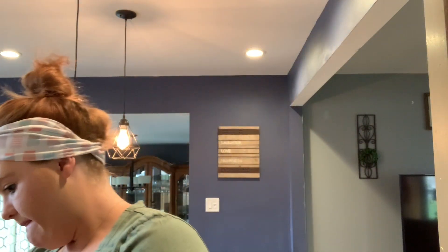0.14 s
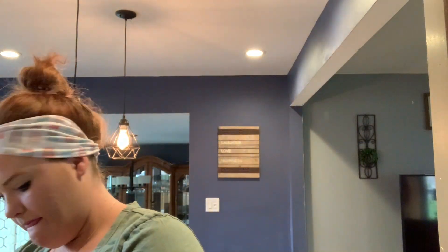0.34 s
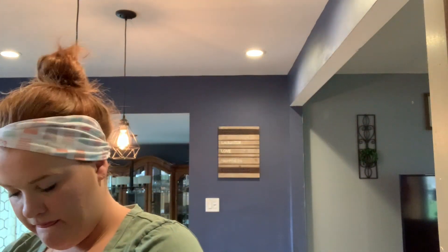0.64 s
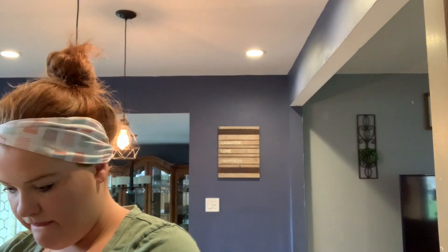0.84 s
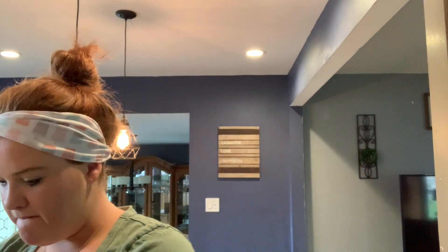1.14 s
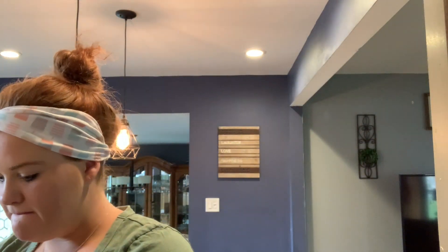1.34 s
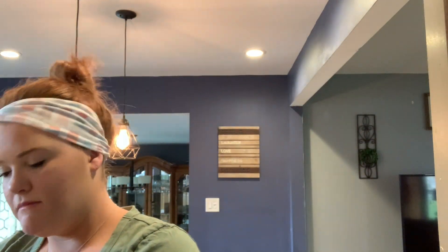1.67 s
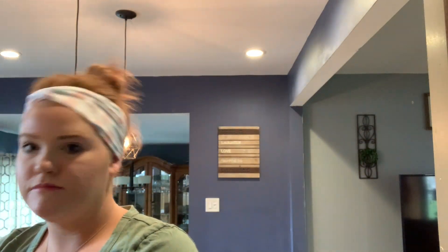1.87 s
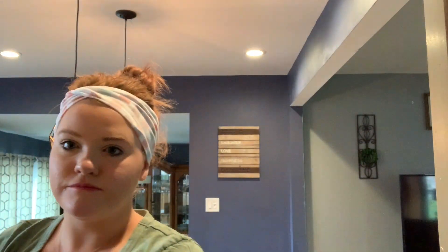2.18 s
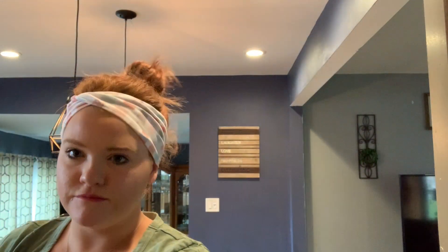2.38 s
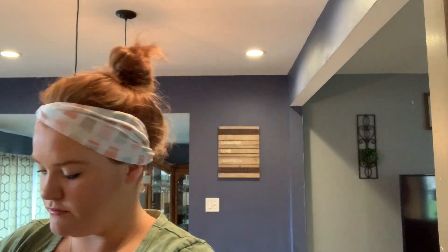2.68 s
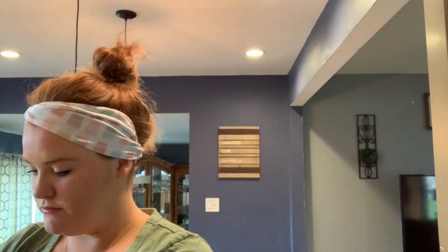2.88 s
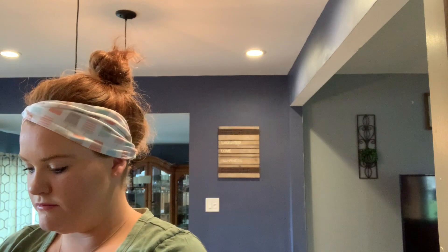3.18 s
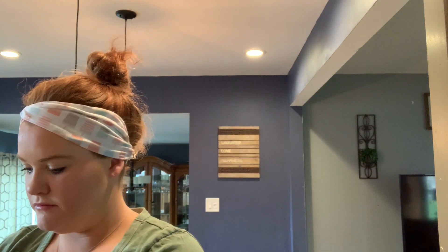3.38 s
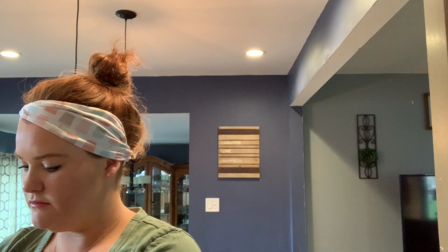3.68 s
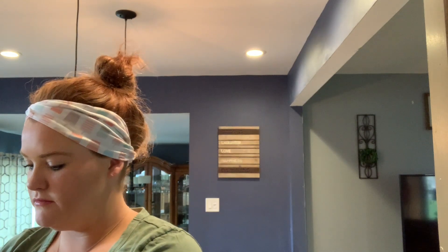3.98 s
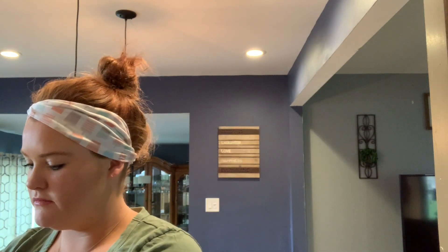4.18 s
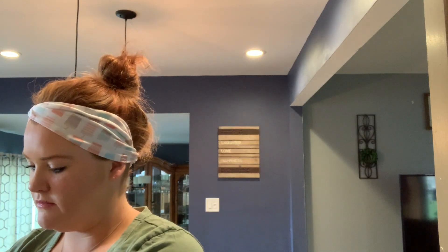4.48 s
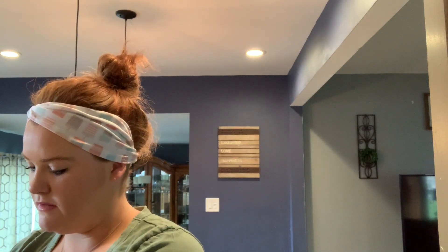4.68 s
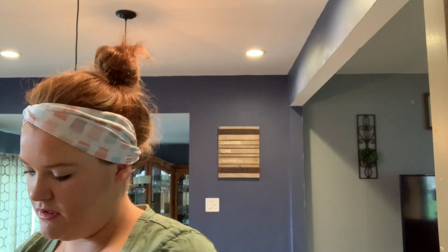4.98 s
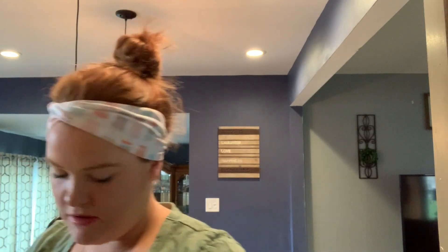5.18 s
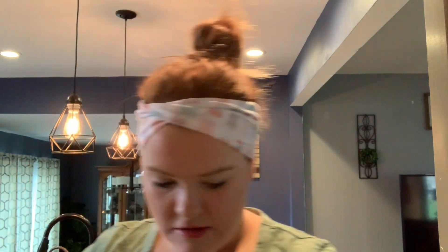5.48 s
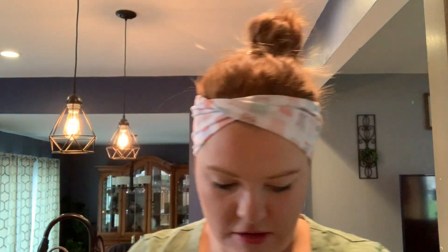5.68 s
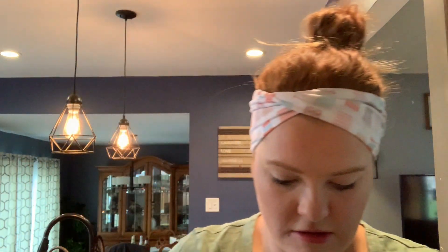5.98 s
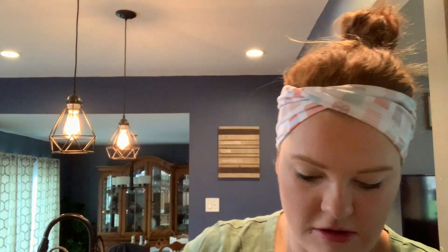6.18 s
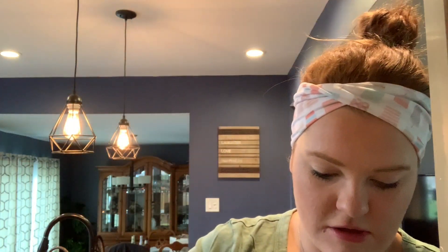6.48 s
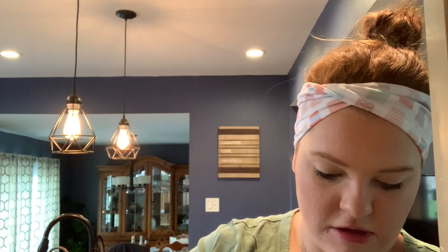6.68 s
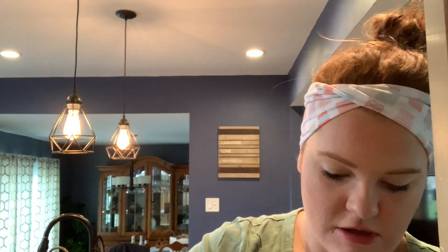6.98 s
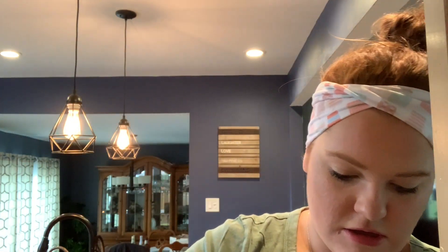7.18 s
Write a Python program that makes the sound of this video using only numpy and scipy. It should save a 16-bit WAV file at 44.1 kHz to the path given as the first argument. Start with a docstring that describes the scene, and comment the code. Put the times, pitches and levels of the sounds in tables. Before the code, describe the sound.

In a quiet home kitchen, a cup lightly knocks and scuffs the dispenser paddle. A flap thumps open and a low motor hums while ice clatters loudly through a plastic bin and drops into the cup. The motor stops, last cubes settle, and after soft handling rustle the carried cup rattles with bright ice on the other side of a close stereo microphone.

```python
"""Light knocks, then the chute flap of a refrigerator ice dispenser thumps open. Its auger motor hums
for two seconds while ice cubes tumble through the bin and drop into a cup. The cup is then carried
to the other side of the microphone, where its ice rattles. Blows are shaped noise, struck objects are
dying sines, the motor is mains harmonics; diffuse tails add the room, over faint steady noise."""
import sys
import numpy as np
from scipy import signal
from scipy.fft import rfft, irfft, next_fast_len
from scipy.io import wavfile
from scipy.ndimage import uniform_filter1d

SR = 44100
rng = np.random.default_rng(int(sys.argv[2]) if len(sys.argv) > 2 else 0)


def inscribe(sig):
    """Save sig as 16-bit PCM at rate SR to the path in sys.argv[1].

    A 1-D sig is mono; a 2-D sig holds one channel per row.
    Samples are clipped to [-1, 1] before scaling.
    """
    pcm = np.round(np.clip(np.atleast_2d(sig).T, -1, 1) * 32767)
    wavfile.write(sys.argv[1], SR, pcm.astype(np.int16))


N = 323694

# Event and mode levels are relative to the offsets in the functions; t60 is the time to fall 60 dB.
# hardest blows in bin and chute, from the first jolts of flap and solenoid to the last cube:
# start_s, clack_db, click_db
BIN_BLOWS = [(1.793, -23.5, -42), (1.808, -7, -31), (1.822, -23.5, -23), (1.942, -13, -42.5),
             (1.979, -14.5, -34), (2.019, -8, -35), (2.069, -12, -26), (2.101, -14, -25.5),
             (2.122, -17, -26.5), (2.174, -10, -32), (2.219, -4.5, -28.5), (2.29, -16, -28.5),
             (2.327, -20, -27), (2.418, -17, -28.5), (2.432, -9, -35.5), (2.465, -16.5, -29),
             (2.548, -13, -28), (2.673, -12, -32), (2.7, -17, -38), (2.729, -14.5, -38),
             (2.778, -23.5, -35.5), (2.835, -39, -31.5), (2.882, -32, -27), (3.03, -9.5, -37.5),
             (3.235, -19, -36.5), (3.249, -16, -40.5), (3.308, -20.5, -31.5), (3.455, -14, -36),
             (3.494, -9, -32), (3.565, -15, -23), (3.593, -17, -38.5), (3.654, -10.5, -26.5),
             (3.707, -23, -38), (3.755, -22, -29.5), (3.802, -32.5, -30.5), (3.893, -42, -29.5),
             (4.075, -13.5, -31), (4.09, -16.5, -45), (4.205, -11.5, -42), (4.245, -27, -32.5),
             (4.411, -54, -32)]
# cubes falling from the chute onto ice in the cup: start_s, clack_db, click_db
CUBE_DROPS = [(2.492, -10.5, -43), (3.02, -10.5, -34), (3.063, -12.5, -39.5), (3.083, -13.5, -43),
              (4.122, -13, -37.5), (4.223, -26, -22), (4.518, -31.5, -49), (4.564, -32, -46.5),
              (4.608, -38, -54), (4.66, -42, -53.5), (4.748, -43.5, -57)]
# hardest knocks of ice in the carried cup: start_s, clack_db, click_db
CUP_RATTLES = [(6.192, -47, -49), (6.274, -39, -63), (6.342, -24, -36), (6.355, -22.5, -19.5),
               (6.364, -11.5, -30), (6.379, -21, -22.5), (6.393, -16.5, -28), (6.414, -32, -33),
               (6.44, -22, -27.5), (6.448, -13.5, -20.5), (6.463, -19, -38), (6.531, -11, -23.5),
               (6.596, -20.5, -28.5), (6.645, -18.5, -18), (6.679, -24, -35), (6.706, -40, -31.5),
               (6.778, -16, -20), (6.809, -19, -22), (6.848, -14.5, -36), (6.857, -23, -22),
               (6.867, -17, -23), (6.876, -24, -23.5), (6.89, -23, -28.5), (6.918, -25, -46),
               (7.022, -23, -25.5), (7.161, -30.5, -52)]
# light knocks of cup and paddle: start_s, clack_db, click_db, thud_db
LIGHT_KNOCKS = [(0.364, -42.5, -39.5, -43), (0.657, -44, -38.5, -35.5), (1.463, -45, -50, -24.5),
                (1.543, -42.5, -54, -24), (1.585, -42, -63.5, -37)]
# dull bumps of cup, door and person: start_s, level_db
DULL_BUMPS = [(0.66, -35), (4.04, -36.5), (4.08, -35.5), (5.954, -35.5), (5.988, -33), (6.158, -43),
              (6.24, -44.5), (6.691, -35.5), (7.039, -37)]
# flap swings open and hits its stop: start_s, level_db
FLAP_THUMPS = [(1.802, -16.5), (1.82, -12)]
# ice load hits the side of the cup: start_s, level_db
ICE_SLAPS = [(6.341, -19.5), (6.531, -22), (6.638, -25), (7.017, -33)]
# cube meets the cup wall squarely: start_s, level_db, tilt_db_per_octave, ring_length_factor
CUP_CLINKS = [(3.428, -25, 2, 0.75), (4.375, -25, -17, 1.1), (4.384, -25, -1.5, 0.62),
              (6.598, -28, 12, 0.34), (6.676, -30, 11.5, 0.76), (6.772, -24, 6, 0.83),
              (7.035, -34, 4.5, 1.14)]

# surges of tumbling ice, two under the auger, one as it stops: start_s, length_s, level_db
ICE_SURGES = [(2.02, 0.36, -27), (3.52, 0.2, -33), (4.02, .11, -23)]
# carried cup tilts, its ice slides: start_s, length_s, level_db
CUP_TILTS = [(5.49, .13, -46), (6.09, 0.22, -43), (6.345, .13, -31), (6.52, .38, -37)]
# hand and sleeve rub on cup and door: start_s, length_s, level_db
HAND_RUBS = [(1.17, 0.38, -56.5), (4.7, 2.51, -61.5), (5.83, 0.053, -44.5), (5.98, 0.086, -48.5)]
# cup scuffs the paddle, going in and coming out: start_s, length_s, level_db
PADDLE_SCUFFS = [(1.355, .09, -47), (5.83, .05, -48)]

# flap and door modes: pitch_hz, level_db, t60_s
DOOR_MODES = [(145.2, -4, 0.27), (161.5, 5.5, 0.035), (273.6, 4.5, 0.046), (359.4, 4.5, 0.094)]
# snapping flap stop: pitch_hz, level_db, t60_s
STOP_MODES = [(1223, 0, 0.1), (2090, 5, 0.13)]
# plastic bin and chute: pitch_hz, level_db, t60_s
PLASTIC_MODES = [(1066.5, 7, 0.072), (1568, -1, 0.05), (3600, -6, 0.12)]
# thin chute walls, singing on after the blows: pitch_hz, level_db, t60_s
CHUTE_WALL_MODES = [(675, 0, .5), (777, -1, .6), (1312, -1, .35)]
# one hard cube pinging: pitch_hz, level_db, t60_s
CUBE_PING_MODES = [(14649, 0, .1), (14848, 0, .09), (15265, 0, .11)]
# cup jostled by loose ice: pitch_hz, level_db, t60_s
JOSTLED_CUP_MODES = [(927, 21, 0.049), (1433, 29, 0.11), (2630, 2, 0.12)]
# cube on cup wall, before the shifts of each clink: pitch_hz, level_db, t60_s
CUP_WALL_MODES = [(1890, 0, 0.055), (3690, -17, 0.04), (4395, -5, 0.08), (4490, -9, 0.035),
                  (5500, -14, 0.04)]
# hollow of the cup: pitch_hz, level_db, t60_s
CUP_HOLLOW_MODES = [(904, 0, .12), (975, -5, .07), (1254, -8, .07)]
# hollow clunk of the cup set in place: pitch_hz, level_db, t60_s
CUP_SET_MODES = [(541, 5, 0.13), (660, 1.5, 0.17)]
# rim scraping as the cup is picked up: pitch_hz, level_db, t60_s
CUP_RIM_MODES = [(3760, 6, 0.01), (4040, 1, 0.011)]
# groaning paddle: pitch_hz, level_db, t60_s
PADDLE_MODES = [(334, 0, 0.032), (433, -1, 0.044)]
# auger motor: mains_multiple, relative_level_db
MOTOR_HARMONICS = [(1, -9), (2, 10), (4, -9), (6, -8)]

# blows in the bin: frequency_hz, relative_density_db
BIN_SPECTRUM = [(60, -7.5), (150, 0), (800, 2), (1400, 3.5), (2200, -4), (3000, -13.5), (4000, -20),
                (6500, -15), (8800, -21.5), (12000, -20.5), (15500, -43)]
# drops onto ice: frequency_hz, relative_density_db
DROP_SPECTRUM = [(100, -11.5), (400, 3.5), (1300, 6), (2300, 3.5), (3300, -12), (4200, -23), (6500, -19),
                 (9000, -24), (15500, -37.5)]
# ice in the carried cup: frequency_hz, relative_density_db
CUP_SPECTRUM = [(60, -7.5), (150, 1), (240, -23), (400, -8.5), (570, -26.5), (880, 2.5), (1150, 0.5),
                (1600, -7.5), (2400, -6), (3200, -12.5), (5500, 1), (7200, 4.5), (9000, 0.5), (13000, -8.5)]
# knocks of cup and paddle: frequency_hz, relative_density_db
KNOCK_SPECTRUM = [(60, -7), (200, 1), (400, 5), (580, 4.5), (1500, 1.5), (2500, -9), (3100, -17),
                  (4000, -30), (5600, -26), (15000, -44.5)]
# brittle crack of first contact: frequency_hz, relative_density_db
CRACK_SPECTRUM = [(400, -31.5), (1800, -2.5), (6000, -4.5), (14000, -2.5)]
# rubbing: frequency_hz, relative_density_db
RUB_SPECTRUM = [(80, -18), (390, 3), (600, -5), (1400, -5.5), (2200, -9), (4300, -18.5), (7000, -27.5),
                (15000, -50)]
# steady background noise: frequency_hz, relative_density_db
AIR_SPECTRUM = [(25, -40), (42, -16.5), (60, 3), (85, -14.5), (150, -4), (230, -14), (500, -19.5),
                (1100, -36), (1700, -43), (2500, -35), (3200, -50.5), (4500, -53), (9000, -52.5),
                (13000, -55)]

# microphone pair, from the refrigerator: frequency_hz, likeness_0_to_1, left_lead_rad, left_minus_right_db
FROM_FRIDGE_PORTS = [(120, .99, 0, 7), (340, .85, 0, 2), (600, .35, 1.7, 3), (1030, .5, .6, 1),
                     (2150, .6, .4, 0), (2930, .3, 2.4, -1), (4000, .35, .7, -1), (6000, .4, 1.7, 0),
                     (8600, .98, 3.1, 0), (10200, .88, 3.5, 0), (13000, .96, 6.2, 0)]
# microphone pair, from the other side: frequency_hz, likeness_0_to_1, left_lead_rad, left_minus_right_db
FROM_SIDE_PORTS = [(100, .95, 0, 3), (800, .92, -2.2, -1), (1550, .7, -3.8, -3), (2500, .85, -7.9, -1),
                   (3200, .85, -9.2, 0), (3800, .8, -11.9, -3), (5500, .7, -17.3, -2),
                   (8800, .95, -15.7, 0), (13000, .92, -12.6, 0)]
# kitchen tails: frequency_hz, t60_s
KITCHEN_DECAY = [(150, 0.48), (530, 0.4), (3700, 0.4), (9700, 0.17), (15000, 0.21)]

MAINS_HZ, EDGE_HZ, AIR_DB = 60, 16100, -52
PING_S, PING_DB = 2.102, -27.5
SNAP_S, SNAP_DB = 1.814, -26
CLUNK_S, CLUNK_DB = 0.66, -38
RIM_S, RIM_LENGTH_S, RIM_DB, RIM_FALL_DB_PER_S = 0.362, 0.0096, -52.5, 141
CARRIED_S = 5  # clinks after this belong to the carried cup
BOUNCE_S, BOUNCE_CLACK_DB, BOUNCE_CLICK_DB = .028, -17, -16  # one weaker rebound
ROCK_S, ROCK_DB = 0.0085, -20  # each rattle rocks the cup in the hand, a moment later
MOTOR_ON_S, MOTOR_RUN_S, MOTOR_DB = 1.805, 2.212, -37
SPIN_UP_S, COAST_DB_PER_S = 0.0187, 348
STIR_DB, RUN_ON_S, SETTLE_DB_PER_S = -35, 0.33, 56  # ice tumbles on after the motor, then settles
SURGE_RISE_S, SURGE_FALL_DB_PER_S = 0.13, 95
TILT_RISE_S, TILT_FALL_DB_PER_S = 0.0053, 292
RUB_RISE_S, RUB_FALL_DB_PER_S, RUB_PATCHY_DB = 0.01, 173, 3.5
GENTLE_DB, DULLING_DB_PER_DB = -43, 0.068  # below GENTLE_DB the click falls faster than the clack
CRACK_T60_S, GRAIN_T60_S, GRAIN_LUMPS_DB = 0.012, 0.045, 6.5  # grain: small contacts
CHATTER_S, SLAP_SPREAD_S = 0.003, 0.005  # decay times of flurries; slapped cubes land spread out


def dispenser():
    """The flap thumps, ice churns in the bin, and cubes clatter down into the cup."""
    blows = with_thud(bounced(BIN_BLOWS), clack_db=-5.5, click_db=2.5, thud_db=-10.5)
    clatter = strikes(blows, BIN_SPECTRUM, thud_t60_s=0.13, clack_t60_s=0.052, click_t60_s=0.064,
                      lumps_db=5.5, rise_s=0.0028, crack_db=7)
    drops = with_thud(bounced(CUBE_DROPS), clack_db=-2.5, click_db=5.0, thud_db=-11.0)
    clatter += strikes(drops, DROP_SPECTRUM, thud_t60_s=0.15, clack_t60_s=0.035, click_t60_s=0.063,
                       lumps_db=6, rise_s=0.0019, crack_db=-3.5)

    tumbling = swells([(MOTOR_ON_S, MOTOR_RUN_S + RUN_ON_S, STIR_DB)], SPIN_UP_S, SETTLE_DB_PER_S)
    stir = np.hypot(tumbling, swells(ICE_SURGES, SURGE_RISE_S, SURGE_FALL_DB_PER_S))
    contacts = jostle(stir, start_s=MOTOR_ON_S, end_s=4.95, clack_db=-2, click_db=-6.5, thud_db=-9.5,
                      spread_db=2.5, count=115)
    churn = strikes(contacts, BIN_SPECTRUM, thud_t60_s=0.14, clack_t60_s=GRAIN_T60_S,
                    click_t60_s=GRAIN_T60_S, lumps_db=GRAIN_LUMPS_DB, rise_s=0.00096, crack_db=1.0)

    partials = chimes(BIN_BLOWS + CUBE_DROPS, low_hz=550, high_hz=6500, ring_db=-13, t60_s=.08)
    blows_sound = clatter + churn + partials
    out = blows_sound + ringing(blows_sound, PLASTIC_MODES, ring_db=-23.5)
    out += ringing(blows_sound, CHUTE_WALL_MODES, ring_db=-24.5)
    out += clinks([row for row in CUP_CLINKS if row[0] < CARRIED_S])
    add(out, PING_S, amp(PING_DB) * chattered(CUBE_PING_MODES, CHATTER_S))
    add(out, SNAP_S, amp(SNAP_DB) * ring(STOP_MODES))
    return kitchen(out, wet_db=-3.5, treble_db=2.5) + flap() + motor()


def flap():
    """Door modes with a slow attack: the heavy door takes a moment to swing."""
    out = np.zeros((2, N))
    door = ring(DOOR_MODES)
    door *= 1 - np.exp(-np.arange(len(door)) / SR / 0.0058)
    for s, db in FLAP_THUMPS:
        add(out, s, amp(db) * door)
    return out


def motor():
    """Mains harmonics of the auger motor, each wavering at random in level and phase."""
    t = np.arange(N) / SR
    knots_s = np.arange(0, t[-1] + 1, .08)
    hum = np.zeros(N)
    for k, db in MOTOR_HARMONICS:
        waver, slip = (np.interp(t, knots_s, row) for row in rng.standard_normal((2, len(knots_s))))
        phase = 2 * np.pi * (round(k) * MAINS_HZ * t + rng.random()) + 0.047 * k * slip
        hum += amp(db + 0.083 * k * waver) * np.sin(phase)
    return swells([(MOTOR_ON_S, MOTOR_RUN_S, MOTOR_DB)], SPIN_UP_S, COAST_DB_PER_S) * evened(hum)


def carried_cup():
    """Loose cubes knock against each other and the wall of the cup."""
    rattles = with_thud(bounced(CUP_RATTLES), clack_db=-1.5, click_db=0, thud_db=-16.0)
    ice = strikes(rattles, CUP_SPECTRUM, thud_t60_s=0.2, clack_t60_s=0.04, click_t60_s=0.018,
                  lumps_db=4.5, rise_s=0.0015, crack_db=0.0)
    sliding = swells(CUP_TILTS, TILT_RISE_S, TILT_FALL_DB_PER_S)
    contacts = jostle(sliding, start_s=CUP_TILTS[0][0], end_s=6.95, clack_db=2.5, click_db=-10.0,
                      thud_db=-19.0, spread_db=3.5, count=170)
    ice += strikes(contacts, CUP_SPECTRUM, thud_t60_s=0.12, clack_t60_s=GRAIN_T60_S, click_t60_s=0.015,
                   lumps_db=GRAIN_LUMPS_DB, rise_s=0.0024, crack_db=-12.5)
    cup = ringing(ice, JOSTLED_CUP_MODES, ring_db=-20)
    ice += cup + chimes(CUP_RATTLES, low_hz=900, high_hz=6500, ring_db=-11, t60_s=.04)
    ice += clinks([row for row in CUP_CLINKS if row[0] > CARRIED_S])
    for s, db in ICE_SLAPS:
        add(ice, s, amp(db) * chattered(CUP_HOLLOW_MODES, SLAP_SPREAD_S))
    rocking = bumps([(s + ROCK_S, (clack + click) / 2 + ROCK_DB) for s, clack, click in CUP_RATTLES])
    return kitchen(ice, wet_db=-11, treble_db=-2.5) + rocking


def strikes(rows, spectrum, thud_t60_s, clack_t60_s, click_t60_s, lumps_db, rise_s, crack_db,
            low_hz=480, high_hz=3500, size=8192):
    """Each blow is a crack plus dense modes in three decaying ranges, with spectral peaks of its own."""
    t, hz = np.arange(size) / SR, np.fft.rfftfreq(size, 1 / SR)
    below = 1 / (1 + (hz / low_hz) ** 8)
    above = 1 - 1 / (1 + (hz / high_hz) ** 8)
    # rows: clack, click, thud, crack
    ranges = np.sqrt([abs(1 - below - above), above, below]) * amp(read(spectrum, hz))
    ranges = np.vstack([ranges, amp(read(CRACK_SPECTRUM, hz))])
    decay = amp(-60 * t / np.array([[clack_t60_s], [click_t60_s], [thud_t60_s], [CRACK_T60_S]]))
    shape = decay * (1 - np.exp(-t / (rise_s * np.array([[1], [1], [2], [.5]]))))
    peaks_hz = np.linspace(0, np.sqrt(SR / 2), 85) ** 2
    out = np.zeros((2, N))
    for s, clack, click, thud in rows:
        own = ranges * amp(lumps_db * np.interp(hz, peaks_hz, rng.standard_normal(len(peaks_hz))))
        own *= size / np.sqrt(2 * np.sum(own ** 2, 1, keepdims=True))
        phases = np.exp(2j * np.pi * rng.random((2, 1, len(hz))))
        gains = amp([clack, click, thud, click + crack_db])[:, None]
        add(out, s, (irfft(phases * own) * shape * gains).sum(1))
    return out


def with_thud(rows, clack_db, click_db, thud_db):
    """The thud of a blow grows with both its clack and its click."""
    return [(s, clack + clack_db, click + click_db, (clack + click) / 2 + thud_db)
            for s, clack, click in rows]


def bounced(rows):
    """Each blow and its weaker rebound."""
    return rows + [(s + BOUNCE_S * rng.uniform(.85, 1.15), clack + BOUNCE_CLACK_DB, click + BOUNCE_CLICK_DB)
                   for s, clack, click in rows]


def jostle(stir, start_s, end_s, clack_db, click_db, thud_db, spread_db, count):
    """Many small contacts at chance moments, their strength following the stirring of the ice."""
    s = start_s + (end_s - start_s) * (np.arange(count) + 2 * rng.random(count)) / count
    stir_db = 20 * np.log10(np.interp(s, np.arange(N) / SR, stir) + 1e-9)
    chance = rng.standard_normal((count, 3)) + rng.standard_normal((count, 1))
    chance_db = spread_db * chance.clip(-2, 2)
    dull_db = np.outer(DULLING_DB_PER_DB * np.minimum(stir_db - GENTLE_DB, 0), [0, 1, 0])
    levels_db = stir_db[:, None] + [clack_db, click_db, thud_db] + chance_db + dull_db
    return np.column_stack([s, levels_db])


def chimes(rows, low_hz, high_hz, ring_db, t60_s, count=3):
    """Each blow rings with its own partials: low ones follow its clack, high ones its click."""
    out = np.zeros((2, N))
    for s, clack, click in rows:
        height = (np.arange(count) + rng.random(count)) / count
        modes = [(low_hz * (high_hz / low_hz) ** h, clack + (click - clack) * h, t60_s * rng.uniform(0.81, 1.6))
                 for h in height]
        add(out, s, amp(ring_db) * chattered(modes, CHATTER_S / 2))
    return out


def clinks(rows):
    """Clear cup rings; the contact point shifts the modes, tilts their levels and scales their decay."""
    out = np.zeros((2, N))
    for s, db, tilt_db, length in rows:
        modes = [(hz * (1 + 0.008 * rng.standard_normal()),
                  mode_db + tilt_db * np.log2(hz / CUP_WALL_MODES[0][0]),
                  t60_s * length) for hz, mode_db, t60_s in CUP_WALL_MODES]
        add(out, s, amp(db) * chattered(modes, CHATTER_S))
    return out


def ring(modes):
    """Dying sines of a struck object."""
    t = np.arange(SR // 2) / SR
    return sum(amp(db - 60 * t / t60_s) * np.sin(2 * np.pi * hz * t) for hz, db, t60_s in modes)


def chattered(modes, chatter_s):
    """The ring of an object hit in a brief flurry of contacts, at the energy of a clean ring."""
    clear, t = ring(modes), np.arange(SR // 20) / SR
    flurry = rng.standard_normal((2, len(t))) * np.exp(-t / chatter_s)
    rough = signal.oaconvolve(flurry, clear[None], axes=1)
    return rough * np.linalg.norm(clear) / np.linalg.norm(rough, axis=1, keepdims=True)


def ringing(x, modes, ring_db):
    """What an object sings when the blows x reach it."""
    wall = ring(modes)
    return amp(ring_db) * signal.oaconvolve(x, wall[None] / np.linalg.norm(wall), axes=1)[:, :N]


def handling():
    """Light knocks, dull bumps and rustle from the person at the refrigerator."""
    out = strikes(LIGHT_KNOCKS, KNOCK_SPECTRUM, thud_t60_s=0.056, clack_t60_s=0.15, click_t60_s=0.049,
                  lumps_db=5.5, rise_s=0.0012, crack_db=-20)
    scrape = rng.standard_normal((2, N)) * swells([(RIM_S, RIM_LENGTH_S, RIM_DB)], 0.0025, RIM_FALL_DB_PER_S)
    out += ringing(scrape, CUP_RIM_MODES, ring_db=-0.5)
    scuff = rng.standard_normal((2, N)) * swells(PADDLE_SCUFFS, RUB_RISE_S, RUB_FALL_DB_PER_S)
    out += ringing(scuff, PADDLE_MODES, ring_db=0.5)
    add(out, CLUNK_S, amp(CLUNK_DB) * ring(CUP_SET_MODES))
    out += amp(-3.0) * rustle(patchy_db=RUB_PATCHY_DB)
    return kitchen(out, wet_db=-1.5, treble_db=9.0) + bumps(DULL_BUMPS)


def rustle(patchy_db):
    """Rubbing noise that catches in short patches of time and pitch."""
    z = signal.stft(rng.standard_normal((2, N)), nperseg=512)[2]
    patches = uniform_filter1d(rng.standard_normal(z.shape[1:]), size=4, axis=0)
    patches = evened(uniform_filter1d(patches, size=5, axis=1))
    rub = signal.istft(z * amp(patchy_db * patches), nperseg=512)[1][:, :N]
    return swells(HAND_RUBS, RUB_RISE_S, RUB_FALL_DB_PER_S) * coloured(rub, RUB_SPECTRUM)


def bumps(rows):
    """Soft, low thuds of decaying noise, from start_s, level_db rows."""
    t, out = np.arange(SR // 3) / SR, np.zeros((2, N))
    spectrum = [(25, -23), (70, -3.0), (140, 2.0), (230, -12.0), (500, -17.5), (1500, -59)]
    for s, db in rows:
        thud = coloured(rng.standard_normal((2, len(t))), spectrum)
        add(out, s, amp(db) * thud * np.exp(-t / 0.051) * (1 - np.exp(-t / 0.0008)))
    return out


def background_air():
    """Steady noise with a fixed spectrum."""
    return amp(AIR_DB) * coloured(rng.standard_normal((2, N)), AIR_SPECTRUM)


def kitchen(x, wet_db, treble_db, count=3):
    """Diffuse room tails that die by band; their blend turns once a second."""
    hz, t, z = signal.stft(rng.standard_normal((count, 2, SR * 2 // 3)), SR, nperseg=256)
    z = z * amp(-60 * t / read(KITCHEN_DECAY, hz)[:, None]) * (1 - np.exp(-t / .006))
    z *= amp(read([(2000, 0.0021), (10000, treble_db)], hz))[:, None]
    tails = signal.istft(z, SR, nperseg=256)[1]
    tails /= np.linalg.norm(tails, axis=-1, keepdims=True)
    turn = 2 * np.pi * np.arange(N) / SR
    wet = sum(signal.oaconvolve(x * np.cos(turn + np.pi * k / count), tails[k], axes=1)[:, :N]
              for k in range(count))
    return x + amp(wet_db) * wet


def ports(x, direction):
    """Mix two versions of a sound into two microphone ports, by likeness, phase and balance."""
    size = next_fast_len(N + 4096)
    hz, (a, b) = np.fft.rfftfreq(size, 1 / SR), rfft(x, size)
    same = np.clip(read(direction, hz, axis=1), 0, 1)
    lead_rad = read(direction, hz, axis=2)
    balance = amp(read(direction, hz, axis=3) / 2)
    right = (same * a + np.sqrt(1 - same ** 2) * b) * np.exp(-1j * lead_rad)
    return irfft(np.array([a * balance, right / balance]), size)[:, :N]


def swells(rows, rise_s, fall_db_per_s):
    """Gain of movements that build up, hold and die away, from start_s, length_s, level_db rows."""
    t = np.arange(N) / SR
    gains = [np.clip((t - s) / rise_s, 0, 1) * amp(db - fall_db_per_s * np.maximum(t - s - length_s, 0))
             for s, length_s, db in rows]
    return np.linalg.norm(gains, axis=0)


def coloured(x, spectrum):
    """Give x a spectrum, at unit RMS."""
    hz = np.fft.rfftfreq(x.shape[-1], 1 / SR)
    return evened(irfft(rfft(x) * amp(read(spectrum, hz)), x.shape[-1]))


def read(points, hz, axis=1):
    """One column of a table, interpolated along log frequency."""
    table = np.array(points, float)
    return np.interp(np.log(hz + 1), np.log(table[:, 0] + 1), table[:, axis])


def amp(db):
    """Decibels to amplitude."""
    return 10 ** (np.asarray(db) / 20)


def evened(x):
    """Scale to unit RMS."""
    return x / np.sqrt(np.mean(x ** 2) + 1e-20)


def add(mix, s, sound):
    """Add a sound in place at s seconds, cut at the end of the mix."""
    part = mix[:, round(s * SR):][:, :sound.shape[-1]]
    part += sound[..., :part.shape[-1]]


def scene():
    """Dispenser, handling and air from the refrigerator; the carried cup from the other side."""
    fridge = dispenser() + handling() + background_air()
    return ports(fridge, FROM_FRIDGE_PORTS) + ports(carried_cup(), FROM_SIDE_PORTS)


def record(dry):
    """Bass cut at 42 Hz and treble limit at EDGE_HZ."""
    dry = signal.sosfilt(signal.butter(4, 42, "high", fs=SR, output="sos"), dry)
    return signal.oaconvolve(dry, signal.firwin(401, EDGE_HZ, window=("kaiser", 8), fs=SR)[None], "same")


dry = scene()
out = record(dry)
inscribe(out)
```